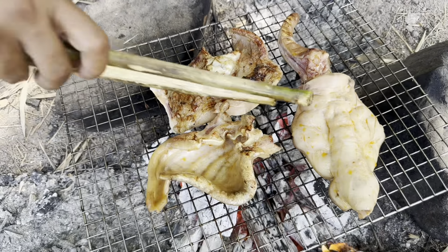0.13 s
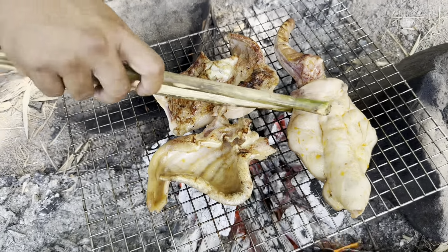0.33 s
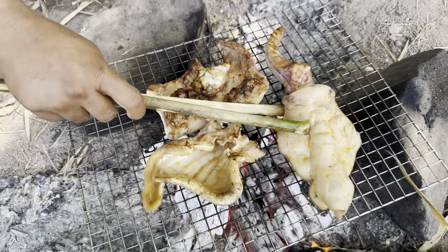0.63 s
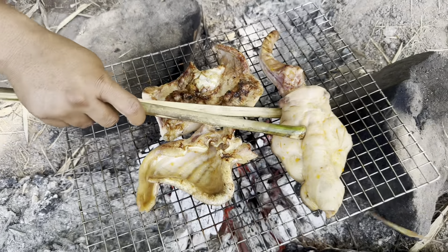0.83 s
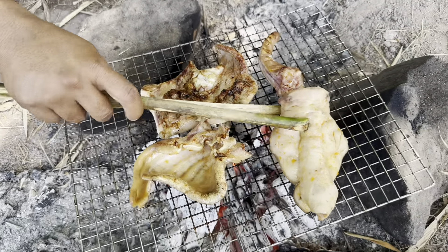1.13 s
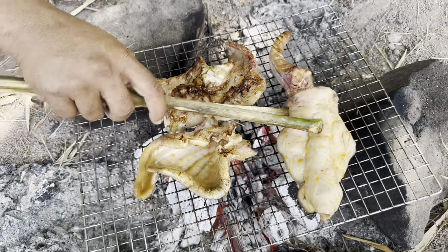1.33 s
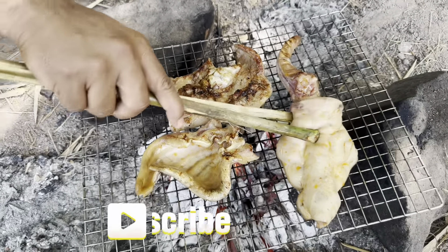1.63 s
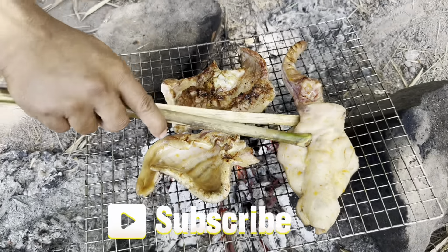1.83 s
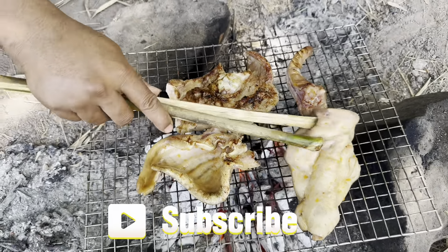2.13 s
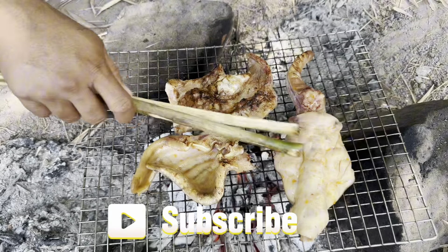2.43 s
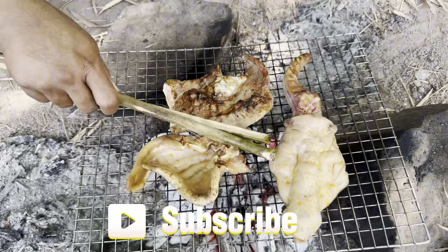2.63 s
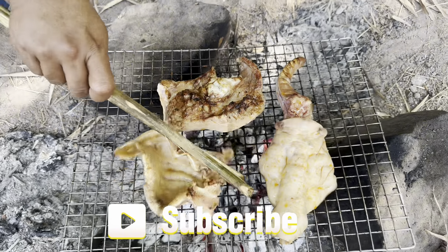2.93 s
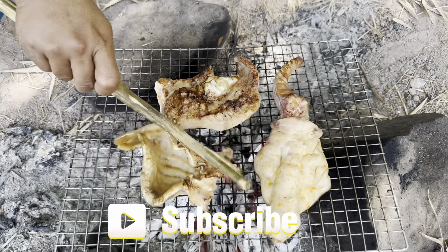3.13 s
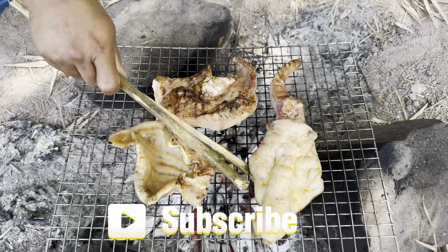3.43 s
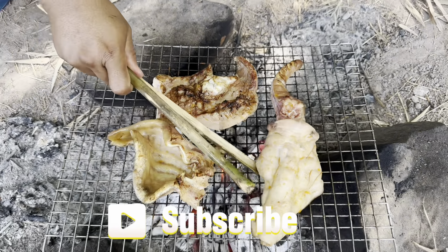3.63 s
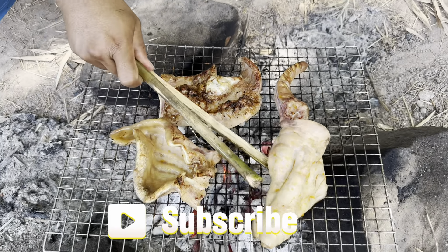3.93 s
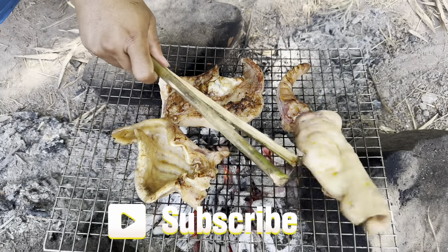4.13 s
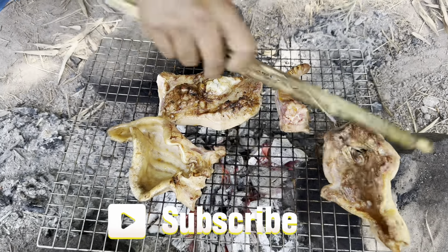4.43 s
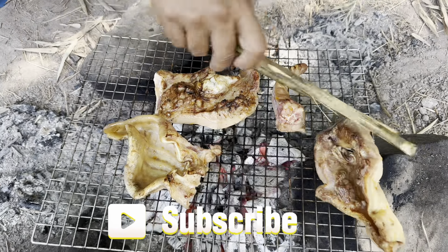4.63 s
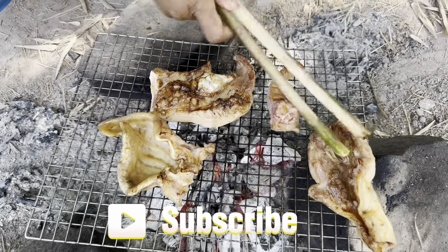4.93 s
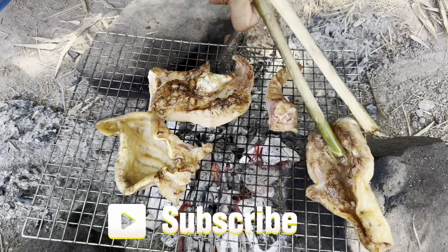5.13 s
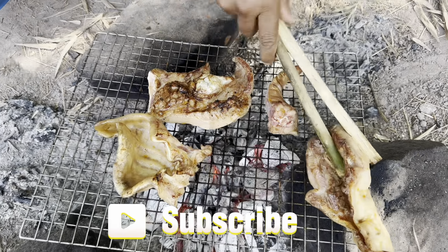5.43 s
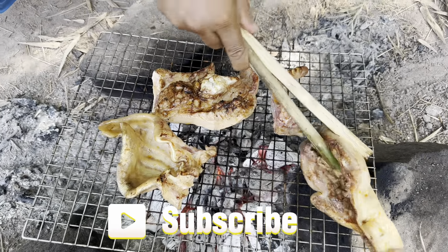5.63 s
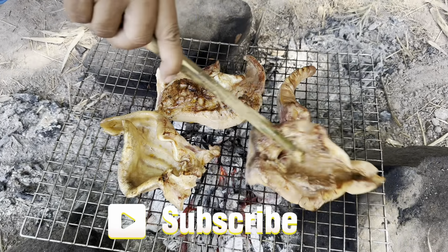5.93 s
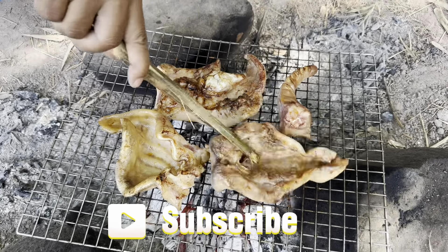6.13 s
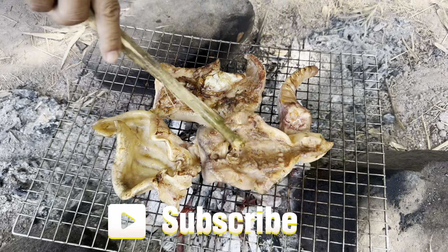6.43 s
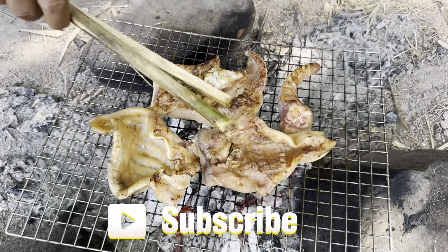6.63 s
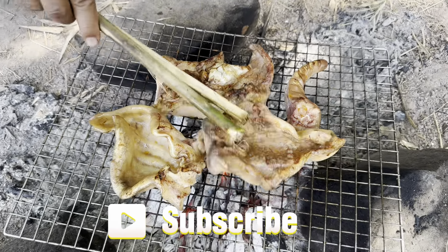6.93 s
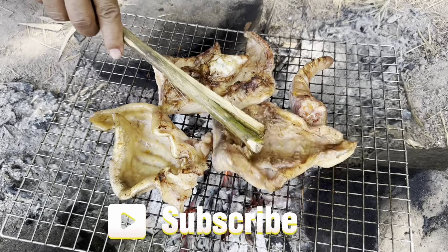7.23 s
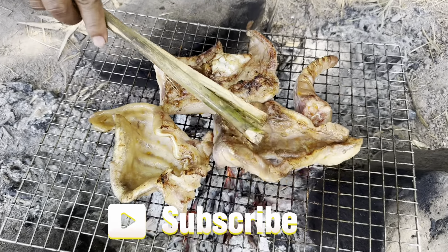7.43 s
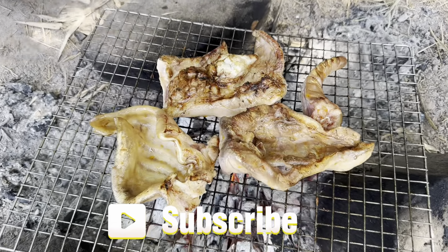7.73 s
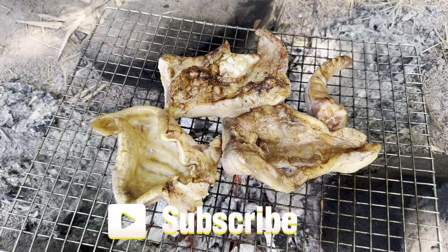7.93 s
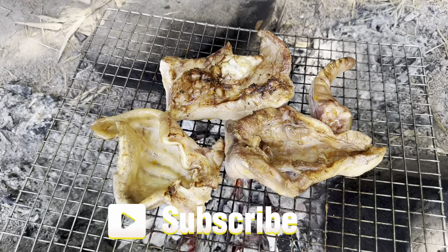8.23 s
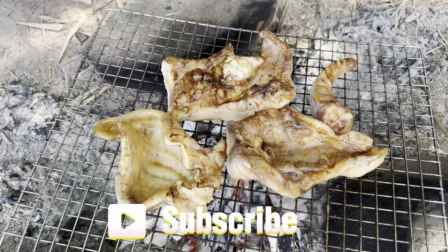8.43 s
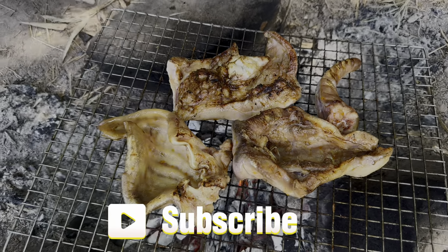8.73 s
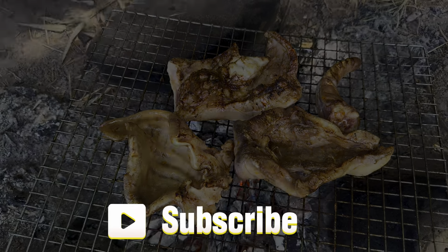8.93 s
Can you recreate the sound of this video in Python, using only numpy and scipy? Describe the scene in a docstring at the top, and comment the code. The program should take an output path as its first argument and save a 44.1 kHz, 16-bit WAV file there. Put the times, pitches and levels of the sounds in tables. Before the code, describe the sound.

Outdoors, close to a small charcoal grill, meat sizzles softly with fine hiss, ember pops and tiny squeaks. Off to the right wood is chopped about every 0.4 seconds, thudding and splintering with a hollow echo. Bamboo tongs clack around two seconds and again before six; then the turned meat sizzles louder. Light wind rumbles on the microphone.

```python
"""Meat over charcoal, wood chopped nearby

Meat sizzles on a wire rack outdoors: coloured noise and tiny random bursts, louder once a piece is turned.
Embers and fat pop, small pitched squeaks sink; bamboo tongs clack as short contacts ring their modes.
Light wind flutters on the microphone as slow noise, over the soft rush of the fire and a faint hum.
Off to the right someone chops wood at a fairly even pace: ringing thuds, splinters and a soft, hollow echo."""
import sys
import numpy as np
from scipy import signal
from scipy.fft import rfft, irfft
from scipy.io import wavfile
from scipy.ndimage import uniform_filter1d

SR = 44100
rng = np.random.default_rng(int(sys.argv[2]) if len(sys.argv) > 2 else 0)


def dump(signal):
    """Clip the signal to [-1, 1] and save it as 16-bit WAV at the path in sys.argv[1]."""
    limited = np.clip(np.atleast_2d(signal).T, -1, 1)
    pcm = np.round(limited * 32767).astype(np.int16)
    wavfile.write(sys.argv[1], SR, pcm)


N = 400428
HIT_S = .02  # the level of a short sound is its energy spread over this time
LEAD_S = .022  # room left before the peak of a break


def amp(db):
    """Turns decibels into a gain."""
    return 10 ** (np.asarray(db) / 20)


def unit(x):
    """Scales a sound to rms 1."""
    return x / np.sqrt(np.mean(x ** 2) + 1e-20)


def hit_level(x, db):
    """Scales a short sound to the energy that this level has over HIT_S seconds."""
    return amp(db) * unit(x) * np.sqrt(HIT_S * SR / x.shape[-1])


def band(x, edges, order=2):
    """Keeps the part of a sound between two frequencies."""
    sos = signal.butter(order, edges, "bandpass", fs=SR, output="sos")
    return signal.sosfilt(sos, x)


def pan(balance_db):
    """Left and right gains; a positive balance is louder on the left."""
    return amp([[balance_db / 2], [-balance_db / 2]])


def add(mix, s, sound):
    """Mixes a stereo sound in at time s."""
    part = mix[:, max(round(s * SR), 0):][:, :sound.shape[1]]
    part += sound[:, :part.shape[1]]


def curve(table, axis):
    """Draws straight lines in dB between the rows of a table and returns a gain for every sample."""
    rows = np.array(table)
    return amp(np.interp(np.arange(N) / SR, rows[:, 0], rows[:, axis]))


def wander(per_s):
    """Smooth random curve of rms 1 that changes about per_s times a second."""
    hz = np.fft.rfftfreq(N, 1 / SR)
    smooth = rfft(rng.standard_normal(N)) * np.exp(-(hz / per_s) ** 2)
    return unit(irfft(smooth, N))


def colour(x, points, edges):
    """Gives a sound a spectrum, with rms 1 between the edges."""
    hz = np.fft.rfftfreq(N, 1 / SR)
    point_hz, point_db = np.transpose(points)
    shaped = rfft(x) * amp(np.interp(np.log(hz + 1), np.log(point_hz), point_db))
    inside = (hz > edges[0]) * (hz < edges[1])
    return irfft(shaped, N) / np.std(irfft(shaped * inside, N))


def pair(alike, size=N):
    """White noise in two channels; alike is their correlation."""
    a, b = rng.standard_normal((2, size))
    return np.array([a, alike * a + np.sqrt(1 - alike ** 2) * b])


def lagged(x, lag_s):
    """Sound from the right reaches the left channel later; a negative lag is the other way round."""
    sides = []
    for side, s in zip(x, (lag_s, -lag_s)):
        wait = max(round(s * SR), 0)
        sides.append(np.pad(side, (wait, 0))[:len(side)])
    return np.array(sides)


def fracture(sharp, spike_s, t60, alike, rise_s, size=4400):
    """Noise rises fast to a spike and leaves a dying shower; sharp is the spike's energy share."""
    t = np.arange(size) / SR - LEAD_S
    after = np.maximum(t, 0)
    rise = np.exp(np.minimum(t, 0) / rise_s)
    spike = pair(alike, size) * np.exp(-after / spike_s) * rise ** 6
    # The loudness jumps at random, in short steps laid over longer ones.
    clumps_db = sum(3.6 * rng.standard_normal(size // n + 1).repeat(n)[:size] for n in (30, 150))
    shower = pair(alike, size) * amp(clumps_db - 60 * after / t60) * rise
    return np.sqrt(sharp) * unit(spike) + np.sqrt(1 - sharp) * unit(shower)


def ringing(x, modes, ring_db, pitch=1):
    """Adds the ring of a body to the sound that excites it; pitch multiplies all its modes."""
    t = np.arange(x.shape[1]) / SR
    ring = sum(amp(db - 60 * t / t60) * np.cos(2 * np.pi * hz * pitch * t) for hz, db, t60 in modes)
    rung = signal.fftconvolve(x, ring[None], axes=1)[:, :len(t)]
    return unit(x) + amp(ring_db) * unit(rung)


def tilted(balance_db, db, bright_db):
    """Levels of three bands: brightness lifts the top as much as it lowers the bottom."""
    return db + np.array(balance_db) + bright_db * np.array([-1, 0, 1])


def voiced(x, borders, levels_db):
    """Sets the low, middle and high band of a short sound."""
    return sum(hit_level(band(x, borders[k:k + 2], order=3), db) for k, db in enumerate(levels_db))


def ground(x, wet_db, t60, top_hz):
    """Adds scattered reflections from earth, stones and plants close by: random taps that die away."""
    t = np.arange(SR // 3) / SR
    taps = rng.standard_normal((2, len(t))) * (rng.random((2, len(t))) < .06)
    taps = taps * (t > .003) * amp(-60 * t / t60)
    taps = taps / np.sqrt((taps ** 2).sum() / 2)
    taps = signal.sosfilt(signal.butter(1, top_hz, fs=SR, output="sos"), taps)
    return x + amp(wet_db) * signal.oaconvolve(x, taps, axes=1)[:, :N]


# low swells, gusts of wind and some shaking of the ground at the blows:
# (time [s], half length [s], rumble level [dB], flutter level [dB])
LOW_SWELLS = [(0.203, 0.21, -52, -62), (0.76, 0.031, -58, -58), (0.838, 0.027, -48, -70),
              (1.038, 0.044, -47, -49), (1.359, 0.021, -42.5, -58), (1.532, 0.11, -53, -57),
              (1.718, 0.011, -56, -45), (1.9, 0.17, -46.5, -53), (2.047, 0.046, -46, -45),
              (2.217, 0.054, -44, -45), (2.331, .04, -45, -52.5), (2.47, 0.04, -42.5, -55.5),
              (2.846, 0.043, -58, -57), (3.34, 0.026, -52, -53), (3.732, 0.084, -49, -54),
              (3.98, 0.037, -40.5, -46), (4.69, 0.13, -49.5, -79), (5.767, 0.06, -45.5, -69),
              (6.047, 0.026, -60, -49.5), (6.371, 0.03, -51, -49.5), (6.782, 0.055, -48, -51),
              (7.015, 0.18, -42, -58), (7.34, 0.099, -43, -59), (7.51, 0.065, -36, -54.5),
              (7.607, 0.061, -32.5, -52.5), (7.832, 0.11, -41.5, -47.5), (8.023, 0.078, -46, -50.5),
              (8.202, 0.072, -47, -50), (8.552, 0.11, -45, -50), (8.718, 0.03, -48, -60),
              (8.857, 0.093, -44, -47), (9.045, 0.037, -41.5, -68)]
# spectra of the rumble and flutter: (frequency [Hz], relative level [dB per Hz])
RUMBLE_SPECTRUM = [(10, -43), (25, -5), (42, 1), (70, 1), (100, -8.5), (150, -23.5), (400, -62)]
FLUTTER_SPECTRUM = [(50, -23), (100, 6.5), (150, -2), (210, -6.5), (300, -12.5), (450, -17), (1200, -88)]
BREEZE_RUMBLE_DB, BREEZE_FLUTTER_DB = -55, -62  # the steady breeze under the swells


def swelling(breeze_db, axis):
    """Strength of the lows: the power of each swell rises and sinks as a bell above the breeze."""
    t = np.arange(N) / SR
    power = amp(breeze_db) ** 2
    for row in LOW_SWELLS:
        power = power + amp(row[axis]) ** 2 * np.exp(-2 * ((t - row[0]) / row[1]) ** 2)
    return np.sqrt(power)


def wind_and_shaking():
    """Wind on the microphone and some shaking ground: deep rumble and higher flutter, both uneven noise."""
    rumble = colour(pair(alike=0.55), RUMBLE_SPECTRUM, (20, 100))
    rumble = rumble * swelling(BREEZE_RUMBLE_DB, axis=2) * amp(1.8 * wander(per_s=10))
    flutter = colour(pair(alike=0.35), FLUTTER_SPECTRUM, (100, 300))
    flutter = flutter * swelling(BREEZE_FLUTTER_DB, axis=3) * amp(3 * wander(per_s=18))
    return rumble + flutter


# strength of a faint far-off hum: (time [s], level [dB])
HUM_LEVEL = [(0, -76.5), (5.2, -86), (5.9, -65), (6.8, -62), (7.6, -57.5), (8.3, -75), (9.08, -70)]
# its tones: (frequency [Hz], relative level [dB])
HUM_TONES = [(175, -2.5), (208, -4.5)]


def hum():
    """Two narrow bands of noise, which waver because they are so narrow."""
    tones = sum(amp(db) * unit(band(pair(alike=0.62), (hz - 5, hz + 5))) for hz, db in HUM_TONES)
    return unit(tones) * curve(HUM_LEVEL, axis=1)


# rush of the glowing bed, before a small trim: (time [s], level [dB])
GLOW = [(0.0, -69), (0.62, -69.5), (6.01, -70), (6.41, -65), (8.85, -62.5)]
# its spectrum: (frequency [Hz], relative level [dB per Hz])
FIRE_SPECTRUM = [(120, 16.5), (300, 5.5), (450, 3.5), (700, 8), (1000, 4.5), (1500, 2.5), (2200, 2),
                 (3500, -2), (8000, -10.5)]


def fire():
    """The soft rush of the fire: broad noise whose strength flickers."""
    flicker = amp(1.6 * wander(per_s=22))
    rush = colour(pair(alike=0.013), FIRE_SPECTRUM, (900, 2200))
    return rush * curve(GLOW, axis=1) * flicker * amp(-0.5)


# the chopped wood as a whole:
# (multiple of the thud's pitch, relative level [dB], time to fade by 60 dB [s] before damping)
WOOD_MODES = [(.55, 0, 0.089), (.66, -13, 0.012), (.82, 8, 0.026), (.98, 15.5, 0.0097), (.81, -14, 0.26),
              (1.14, 11, 0.022), (1.2, -15, 0.24), (1.53, 11, 0.016), (1.83, -18, 0.11)]
# its thin overtone: (multiple of the thud's pitch, relative level [dB], time to fade by 60 dB [s])
WOOD_OVERTONE = (3.1, -6, 0.044)


def thud(hz, damping):
    """Low modes of wood, pushed softly: most sound lies near their pitch, apart from one thin overtone."""
    t = np.arange(9000) / SR
    ring = sum(amp(db - 60 * t * damping / t60) * np.sin(2 * np.pi * hz * k * t) for k, db, t60 in WOOD_MODES)
    k, db, t60 = WOOD_OVERTONE
    overtone = amp(db - 60 * t / t60) * np.sin(2 * np.pi * hz * k * t)
    return band(ring, (hz * 0.5, hz * 1.42), order=3) + overtone * pan(6)


ECHO_RISE_S, ECHO_S = 0.0028, 0.17  # the wash swells, holds, then fades
ECHO_WIDTH_HZ = 63  # width of the narrow resonance
# The resonance peaks late (time varied at random), has a half length, and loses a share of its pitch per second.
ECHO_PEAK_S, ECHO_CORE_S, ECHO_SAG_PER_S = .11, 0.088, 1.104


def hollow_echo(hz):
    """The surroundings answer with a ragged wash; a narrow resonance swells out of it and sinks in pitch."""
    t = np.arange(SR // 2) / SR
    peak_s = ECHO_PEAK_S * rng.uniform(.7, 1.3)
    pitch = hz * (1 - ECHO_SAG_PER_S * (t - peak_s))
    # Slow complex noise turns a pure tone into a narrow band around the gliding pitch.
    smooth = signal.butter(2, ECHO_WIDTH_HZ / 2, fs=SR, output="sos")
    slow_noise = pair(alike=.9, size=len(t)) + 1j * pair(alike=.9, size=len(t))
    waver = signal.sosfilt(smooth, slow_noise)
    tone = np.exp(2j * np.pi * np.cumsum(pitch) / SR)
    core = unit((waver * tone).real) * np.exp(-((t - peak_s) / ECHO_CORE_S) ** 2)
    wash = unit(band(pair(alike=0.65, size=len(t)), (400, 850)))
    swell = (1 - np.exp(-t / ECHO_RISE_S)) * np.exp(-(t / ECHO_S) ** 3)
    return lagged(amp(-3.5) * core + wash * swell, lag_s=0.00054)


# blows of the blade, levels before the final balance: (time [s], thud level [dB], thud pitch [Hz],
# splintering level [dB], its brightness [dB], its ring [Hz], echo level [dB], echo pitch [Hz])
CHOPS = [(0.098, -58, 935, -53, -2, 3000, -63, 700), (0.474, -53.5, 724, -46.5, -2.5, 2520, -53.5, 641),
         (0.862, -53.5, 680, -48, 0, 2600, -55, 628), (1.633, -52, 920, -46.5, 1, 3200, -58.5, 670),
         (2.006, -44, 466, -53, -1.5, 4070, -60, 624), (2.398, -55, 746, -49, -2.5, 1470, -58, 638),
         (2.78, -53, 675, -51, -2, 3220, -57.5, 568), (3.182, -54, 624, -51, -1.5, 1730, -54.5, 589),
         (3.576, -46, 620, -48.5, -3.5, 1700, -55, 580), (3.973, -44, 528, -48, -2, 1560, -56, 600),
         (4.36, -44.5, 556, -51.5, -1.5, 1940, -59.5, 567), (4.751, -31.5, 600, -47, -2.5, 2300, -55, 621),
         (5.139, -57.5, 550, -55.5, -2.5, 1900, -61.5, 670), (5.539, -41, 672, -47, -4.5, 2700, -54.5, 545),
         (5.944, -59, 666, -54, -3, 2640, -57.5, 596), (6.348, -47, 527, -51, -5, 2550, -59.5, 653),
         (6.764, -35.5, 842, -48, -3.5, 1530, -64, 609), (7.1708, -21.5, 892, -47.5, -5.5, 2600, -62, 727),
         (7.7195, -66, 814, -48.5, -2.5, 2780, -60, 595), (8.098, -50.5, 685, -49, -4.5, 2360, -56, 600),
         (8.506, -50, 700, -49, -5.5, 2500, -60, 639), (8.921, -46.5, 506, -50.5, -5, 2300, -57, 560)]
# ring of the splinters: (multiple of their pitch, relative level [dB], time to fade by 60 dB [s])
SPLINTER_MODES = [(.63, -1, .008), (1.0, 0, .008), (1.2, -3, .012), (1.8, -2, .007)]
# borders of the low, middle and high band of the splintering [Hz]
WOOD_BANDS = [900, 2100, 6500, 13500]
# balance of these three bands [dB]
CRACK_BALANCE_DB = [-7.5, -3, -1]
# spectrum of the shaking ground: (frequency [Hz], relative level [dB per Hz])
SHAKE_SPECTRUM = [(50, -3), (110, 1), (200, -8.5), (350, -13.5), (800, -42)]
REBOUND_S, REBOUND_DB = .03, -22  # the blade bounces once after each blow
# Shaking for a blow of the usual thud level, its growth [dB per dB of thud], and the time to its peak.
SHAKE_DB, USUAL_THUD_DB, SHAKE_GROWTH, SHAKE_S = -51.5, -49.5, 0.5, 0.013


def chopping():
    """Each blow thuds, bounces, splinters, shakes the ground and is answered by a hollow echo."""
    thuds, splinters, echo, shake = np.zeros((4, 2, N))
    t = np.arange(SR) / SR
    for s, thud_db, hz, crack_db, bright_db, ring_hz, echo_db, echo_hz in CHOPS:
        blow = hit_level(lagged(thud(hz, damping=0.7), lag_s=0.0006), thud_db)
        add(thuds, s, blow)
        add(thuds, s + REBOUND_S, blow * amp(REBOUND_DB))

        crack = fracture(sharp=0.05, spike_s=.002, t60=0.06, alike=0.75, rise_s=0.005)
        crack = ringing(crack, SPLINTER_MODES, ring_db=-8, pitch=ring_hz)
        levels_db = tilted(CRACK_BALANCE_DB, crack_db, bright_db)
        add(splinters, s - LEAD_S, voiced(lagged(crack, lag_s=.00048), WOOD_BANDS, levels_db))

        add(echo, s, amp(echo_db) * hollow_echo(echo_hz))

        shake_db = SHAKE_DB + SHAKE_GROWTH * (thud_db - USUAL_THUD_DB)
        push = amp(shake_db) * t / SHAKE_S * np.exp(1 - t / SHAKE_S)
        add(shake, s, np.tile(push, (2, 1)))
    low_noise = colour(pair(alike=0.98), SHAKE_SPECTRUM, (100, 300))
    thuds = ground(thuds, wet_db=-15, t60=.14, top_hz=1500)
    splinters = ground(splinters, wet_db=-1, t60=0.34, top_hz=8360)
    return (thuds * pan(-6.0) * amp(-2.5)
            + splinters * pan(-1.9) * amp(0.3)
            + echo * pan(-4.5) * amp(-1.5)
            + shake * low_noise * amp(-3.5))


# wood splitting under the blade, levels before reflections: (time [s], level [dB], ring [Hz])
SPLITS = [(0.476, -44.5, 2700), (0.8628, -56, 2600), (1.6353, -45, 2400), (4.7525, -49.5, 2050),
          (4.7572, -66, 2650), (5.151, -58, 2670), (7.7201, -40, 2320), (7.7245, -45, 2770),
          (7.7335, -53, 2380), (8.0987, -49, 2320), (8.504, -46, 2290)]


def splits():
    """Fibres of the chopped wood give way at once: a hard click and a short ring."""
    out = np.zeros((2, N))
    t = np.arange(2000) / SR
    for s, db, hz in SPLITS:
        ring = sum(amp(mode_db - 60 * t / t60) * np.cos(2 * np.pi * hz * k * t)
                   for k, mode_db, t60 in SPLINTER_MODES)
        grit = pair(alike=0.33, size=len(t)) * np.exp(-t / 0.0028)
        snap = band(unit(ring) + amp(-5) * unit(grit), (1100, 7000))
        add(out, s, hit_level(lagged(snap, lag_s=.00045), db))
    return ground(out, wet_db=-7.5, t60=0.058, top_hz=5000) * pan(-1.3)


# dull knocks and bumps, levels before the final balance: (time [s], level [dB], pitch [Hz])
BUMPS = [(0.173, -38.5, 477), (1.0582, -44.5, 202), (1.362, -47, 156), (1.818, -44.5, 178),
         (2.012, -41.5, 242), (2.0412, -47, 251), (2.1834, -47, 172), (2.228, -41, 388),
         (2.2321, -35.5, 180), (2.261, -49.5, 450), (2.616, -45.5, 195), (3.33, -43, 156),
         (3.802, -44, 157)]


def bumps():
    """Soft blows with little treble; the lower their pitch, the slower they die."""
    out = np.zeros((2, N))
    t = np.arange(4000) / SR
    for s, db, hz in BUMPS:
        tone = np.sin(2 * np.pi * hz * t) * np.exp(-hz * t / 0.65)
        push = band(tone, (hz * .5, hz * 2.7), order=3)
        add(out, s, np.tile(hit_level(push, db), (2, 1)))
    return out * amp(-7.0)


# brief swishes, of things sliding on the wires or of splintering wood:
# (time [s], half length [s], level [dB], centre [Hz])
SWISHES = [(1.254, .025, -58.5, 2190), (1.755, 0.012, -38, 2590), (1.961, 0.0086, -47, 8500),
           (2.217, 0.02, -50, 9200), (2.4, 0.018, -51.5, 1900), (3.129, 0.014, -50, 8000),
           (5.407, 0.024, -65, 2130), (6.221, 0.018, -53, 3370), (7.88, 0.036, -49.5, 8800),
           (7.989, 0.067, -61.5, 1790), (8.113, 0.0081, -47.5, 2230)]


def swishes():
    """Things slide on the wires or wood splinters: a short swell of grainy noise."""
    out = np.zeros((2, N))
    for s, half_s, db, hz in SWISHES:
        t = np.arange(-3 * half_s, 3 * half_s, 1 / SR)
        # Every 40 samples form a grain with its own random loudness.
        grain_db = 3.5 * rng.standard_normal(len(t))[np.arange(len(t)) // 40]
        grains = rng.standard_normal((2, len(t))) * amp(grain_db)
        swish = unit(band(grains, (hz / 1.45, hz * 1.5)))
        add(out, s + t[0], amp(db) * swish * np.exp(-(t / half_s) ** 2))
    return out


# tongs clacking, levels before reflections: (time [s], level [dB], relative level of the bright tick [dB],
# share of energy in the first spike, left minus right of the lower ring [dB])
CLACKS = [(1.7522, -43.5, -13, 0.1, 3), (1.7648, -37.5, 7, 0.21, 4), (2.166, -36, 2, 0.65, 9),
          (2.1713, -34.5, 6, 0.4, 19), (5.6691, -25.5, -4, 0.68, 11)]
# what the bamboo rings with, before the grip shifts it:
# (frequency [Hz], relative level [dB], time to fade by 60 dB [s])
BAMBOO_MODES = [(2720, -1, .018), (3040, 4, .022), (3360, -7, .025), (4380, -12, .025), (5700, -11, .04),
                (6100, -5, .018), (6590, -10, .04), (7780, -14, .04)]
# borders of the two bands in which the tongs sound [Hz]
TONG_BANDS = [2450, 6400, 8200]
BAMBOO_RING_DB = -13  # ring against contact
GRIP_DETUNE = .008  # typical share by which the grip shifts the pitch


def tongs():
    """Dry snaps that ring the split bamboo: one needle of contact amid a short burst of rough noise."""
    out = np.zeros((2, N))
    for s, db, tick_db, sharp, side_db in CLACKS:
        rough = fracture(sharp=0, spike_s=0.0006, t60=0.03, alike=0.7, rise_s=.0055)
        needle = signal.unit_impulse(rough.shape[1], round(LEAD_S * SR))
        contact = np.sqrt(sharp) * unit(needle) + np.sqrt(1 - sharp) * rough
        grip = 1 + GRIP_DETUNE * rng.standard_normal()
        snap = ringing(lagged(contact, lag_s=-.00038), BAMBOO_MODES, BAMBOO_RING_DB, pitch=grip)
        lower = band(snap, TONG_BANDS[:2], order=3) * pan(side_db)
        upper = band(snap, TONG_BANDS[1:], order=3) * pan(-6.5)
        tick = amp(tick_db) * band(snap, (600, 9000), order=1)
        add(out, s - LEAD_S, hit_level(lower + upper + tick, db))
    return ground(out, wet_db=-18, t60=.1, top_hz=9000)


# fainter pops come at random: rate, mean level, and spread of both level and brightness
SMALL_POPS_PER_S, SMALL_POP_DB, SMALL_POP_SPREAD_DB = 1.3, -62, 1.8


def small_pops(count=60):
    """Rows like those of POPS for faint pops, with random waits between them."""
    chance = rng.random((count, 2))
    spread = SMALL_POP_SPREAD_DB * rng.standard_normal((count, 2))
    times = np.cumsum(-np.log(1 - chance[:, 0])) / SMALL_POPS_PER_S
    rows = zip(times, spread, chance[:, 1])
    return [(s, SMALL_POP_DB + db, bright_db, sharp, 0) for s, (db, bright_db), sharp in rows if s < N / SR]


# the loudest embers and spits of fat, levels before the final balance: (time [s], level [dB],
# brightness [dB], share of energy in the first spike, left minus right [dB])
POPS = [(0.1678, -41.5, 6.5, 1, -2), (0.1738, -50.5, -8, 0.75, -8), (0.348, -51.5, 3, 0.49, 1),
        (0.3487, -59.5, -7.5, 0.5, 10), (0.724, -56.5, -1.5, 0.38, 3), (0.781, -55, -2, 0.42, -1),
        (0.801, -54.5, -1, 0.23, 1), (0.879, -49, 6, 0.51, -1), (1.075, -51.5, -1, 0.71, 0),
        (1.368, -58, 4, .4, 1), (1.4254, -60.5, 2.5, 0.57, 7), (1.479, -55, 2.5, 0.21, 2),
        (1.725, -58, 8, 0.38, 3), (1.941, -43, 2, 0.23, 8), (1.9473, -52, -1.5, 0.23, 16),
        (1.966, -39.5, 2.5, 0.6, 5), (2.1142, -55, 7, 0.65, 2), (2.368, -61, 5, 0.49, 0),
        (2.7217, -58.5, 7, 0.73, 1), (2.9378, -54, 1, 0.37, -2), (3.0079, -54, -9.5, 0.27, -1),
        (3.137, -47, 1.5, 0.12, 0), (3.472, -55.5, 1, 0.82, -1), (3.771, -47, -2.5, 0.95, 3.5),
        (3.913, -58.5, 0, 0.73, 4), (3.9462, -53.5, 3, 0.44, 2), (4.066, -54.5, -2, 0.54, 2),
        (4.5225, -54.5, 4.5, 0.97, 0), (4.9542, -63, 7, .71, -1), (5.024, -56, 0, .22, -1),
        (5.314, -72, 15.5, .6, -1), (5.5017, -56, 0, 0.37, 2), (6.526, -51, -2, 0.31, 2),
        (7.0082, -49, 1, 0.66, 2), (7.334, -56, 0, 0.27, 5), (7.474, -60.5, 6, 0.58, 6),
        (8.415, -50.5, -4.5, 0.77, 0), (8.6706, -55, 0, 0.5, 4)]
# borders of the low, middle and high band of the pops [Hz]
POP_BANDS = [450, 2100, 6500, 14500]
# balance of these three bands [dB]
POP_BALANCE_DB = [-7, -3, -2.5]


def pops():
    """Bursts of steam in coal and fat: a needle of sound with a very short tail."""
    out = np.zeros((2, N))
    for s, db, bright_db, sharp, side_db in POPS + small_pops():
        burst = fracture(sharp, spike_s=0.0006, t60=0.035, alike=0.65, rise_s=0.0025)
        levels_db = tilted(POP_BALANCE_DB, db, bright_db)
        pop = voiced(lagged(burst, lag_s=-.00003), POP_BANDS, levels_db)
        add(out, s - LEAD_S, pop * pan(side_db))
    return ground(out, wet_db=-13.0, t60=0.065, top_hz=11800) * amp(-0.5)


# small pitched ticks and squeaks, one the low body of a pop, levels before the final balance:
# (time [s], level [dB], starting pitch [Hz])
SQUEAKS = [(0.1685, -46, 916), (2.895, -50.5, 3550), (2.956, -54.5, 623), (5.15, -58, 2960),
           (5.588, -51.5, 3070), (5.685, -54, 1960)]
SQUEAK_S, SQUEAK_SAG = 0.0053, 0.16  # decay time, and the share of its pitch that a squeak loses


def squeaks():
    """Small pitched ticks and squeaks, one the low body of a pop: rough tones that sink as they die."""
    out = np.zeros((2, N))
    t = np.arange(2000) / SR
    for s, db, hz in SQUEAKS:
        pitch = hz * (1 - SQUEAK_SAG * (1 - np.exp(-t / (2 * SQUEAK_S))))
        # Noise averaged over one and a half cycles makes the loudness rough.
        slow_noise = uniform_filter1d(pair(alike=0.19, size=len(t)), max(int(1.5 * SR / hz), 1))
        rough = 1 + 2.4 * unit(slow_noise)
        tone = rough * np.sin(2 * np.pi * np.cumsum(pitch) / SR)
        swell = (1 - np.exp(-t / 0.001)) * np.exp(-t / SQUEAK_S)
        add(out, s, hit_level(tone * swell, db))
    return ground(out, wet_db=-4, t60=0.18, top_hz=6000) * pan(1.1) * amp(-0.5)


def bubbles(per_s, spread_db):
    """Tiny bursts of random size at random moments, each louder on one side or the other."""
    size_db = spread_db * np.minimum(rng.exponential(1, N), 5)
    size = amp(size_db) * (rng.random(N) < per_s / SR)
    return unit(size * rng.standard_normal((2, N)))


# strength of the sizzle before the balance of its layers; it sinks while a piece is lifted,
# then surges as the wet side lands: (time [s], level [dB])
HEAT = [(0.0, -68.5), (0.43, -71), (0.8, -67.5), (1.95, -70.5), (2.29, -65), (2.74, -69.5), (3.19, -65),
        (3.96, -68.5), (4.13, -64.5), (5.13, -72), (5.63, -69), (5.75, -69), (6.0, -75.5), (6.15, -62.5),
        (6.28, -62), (6.67, -61.5), (8.14, -68.5), (9.08, -71.5)]
# spectra of the fine hiss and the coarser frying: (frequency [Hz], relative level [dB per Hz])
HISS_SPECTRUM = [(2000, -49), (5000, -5.5), (7500, -2), (10500, -1.5), (12000, -4.5), (13700, -3.5),
                 (14600, -22), (16000, -39)]
FRYING_SPECTRUM = [(900, -19), (1900, -2), (2500, 4.5), (3500, 2.5), (5000, -1.5), (7000, -10),
                   (14000, -44)]


def sizzle():
    """Juice boils in countless bubbles: a fine hiss, a coarser frying and scattered ticks."""
    heat = curve(HEAT, axis=1)
    fine = pair(alike=.15) + amp(-4) * bubbles(per_s=1500, spread_db=3)
    hiss = colour(fine, HISS_SPECTRUM, (7000, 14000)) * heat * amp(5.0 + 0.94 * wander(per_s=28))
    coarse = pair(alike=0) + amp(-6) * bubbles(per_s=400, spread_db=3.5)
    frying = colour(coarse, FRYING_SPECTRUM, (2500, 5000)) * heat * amp(-2.5 + 3.16 * wander(per_s=24))

    # Ticks: sparse bursts set off short rings at ten pitches.
    t = np.arange(200) / SR
    ticks = np.zeros((2, N))
    for hz in np.geomspace(1700, 9000, 10):
        ring = np.sin(2 * np.pi * hz * t) * np.exp(-hz * t / 0.98)
        bursts = bubbles(per_s=15, spread_db=7.0)
        ticks += signal.oaconvolve(bursts, ring[None], axes=1)[:, :N] * hz ** 0.37
    return hiss * pan(-0.38) + frying * pan(8.8) + amp(-77.0) * unit(ticks) * pan(0.85)


def scene():
    """Sums the grill and everything around it."""
    background = wind_and_shaking() + hum() + fire()
    wood = chopping() + splits()
    handling = bumps() + swishes() + tongs()
    return background + wood + handling + pops() + squeaks() + sizzle()


EDGE_HZ = 16300  # the recorder's band limit


def record(dry):
    """A steep softening of the highest treble, then the recorder's band limit."""
    soft = signal.sosfilt(signal.butter(6, 14300, fs=SR, output="sos"), dry)
    limit = signal.firwin(511, EDGE_HZ, window=("kaiser", 9), fs=SR)
    return signal.oaconvolve(soft, limit[None], "same", axes=1)


dry = scene()
out = record(dry)
dump(out)
```